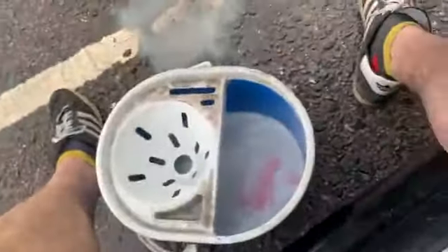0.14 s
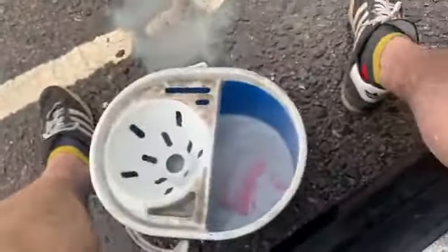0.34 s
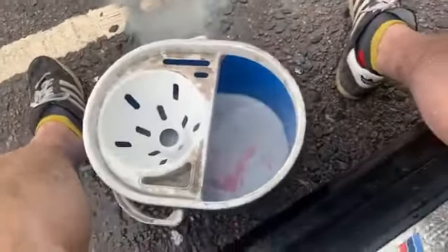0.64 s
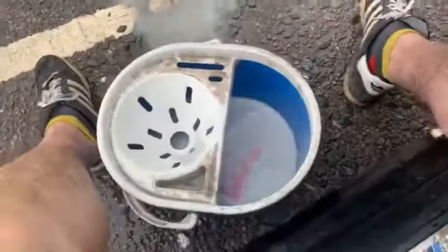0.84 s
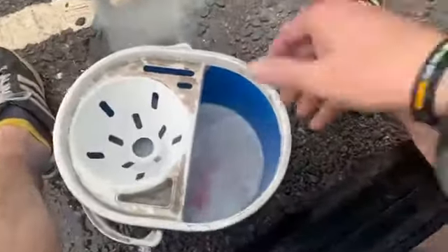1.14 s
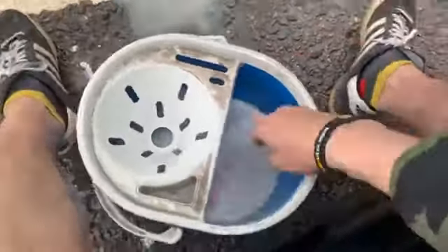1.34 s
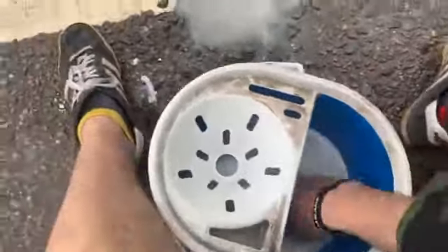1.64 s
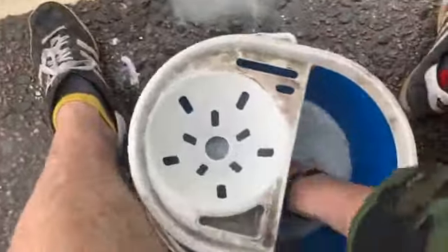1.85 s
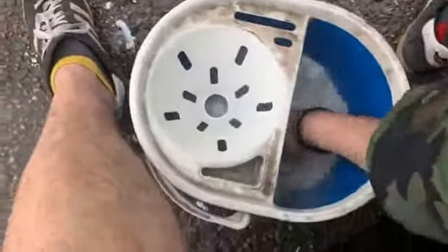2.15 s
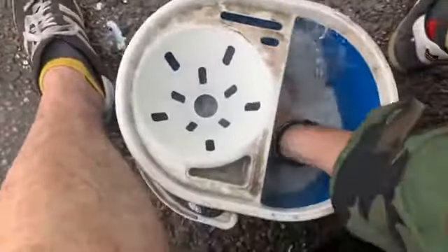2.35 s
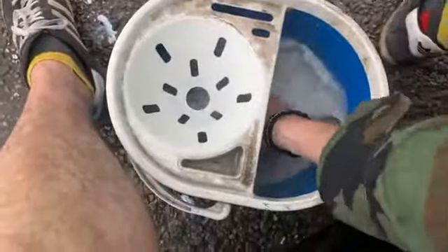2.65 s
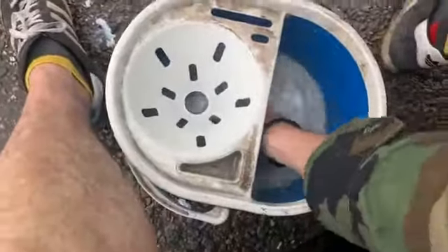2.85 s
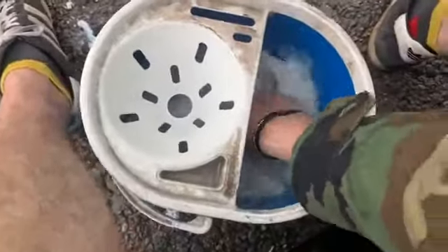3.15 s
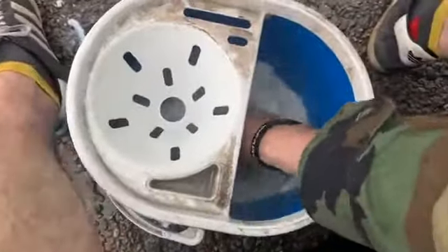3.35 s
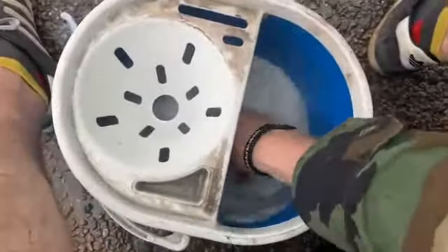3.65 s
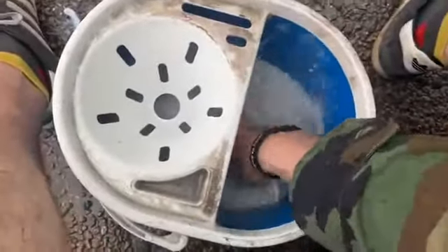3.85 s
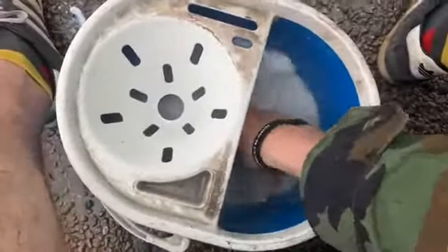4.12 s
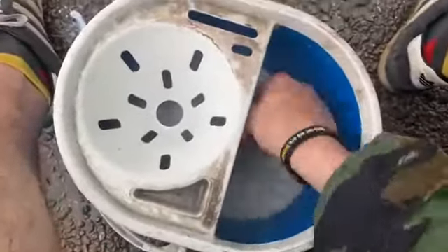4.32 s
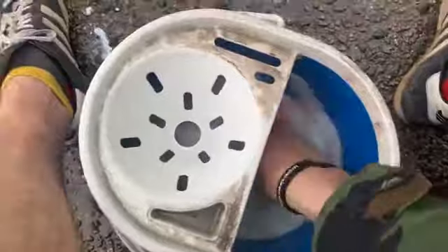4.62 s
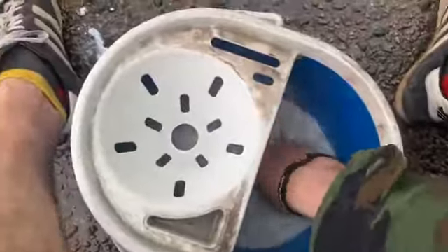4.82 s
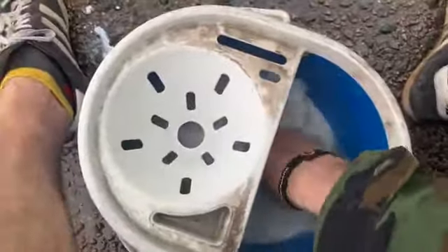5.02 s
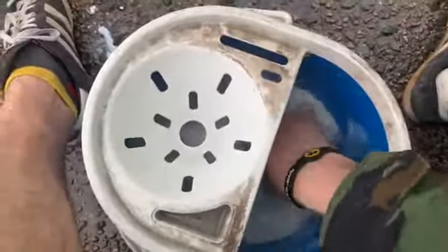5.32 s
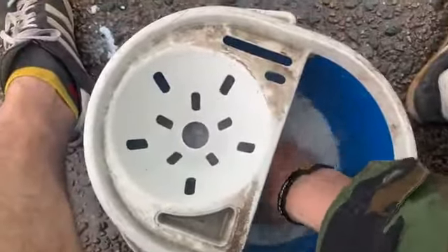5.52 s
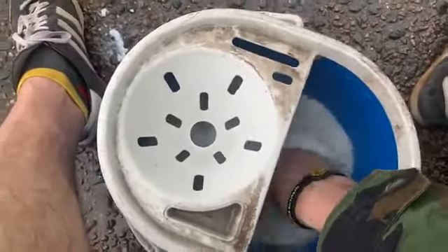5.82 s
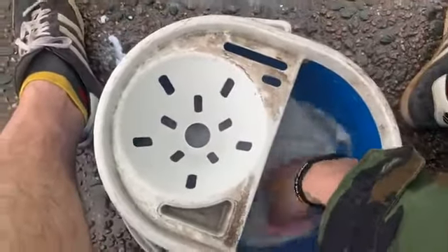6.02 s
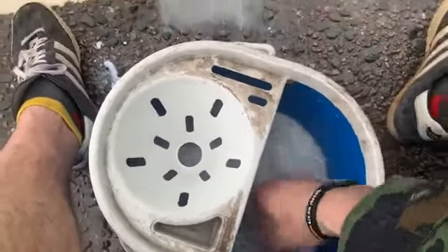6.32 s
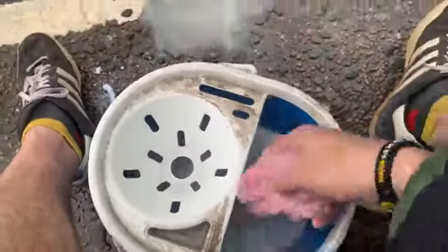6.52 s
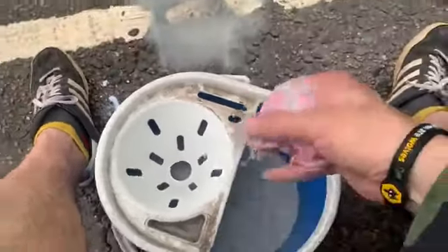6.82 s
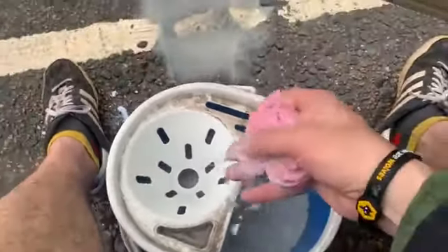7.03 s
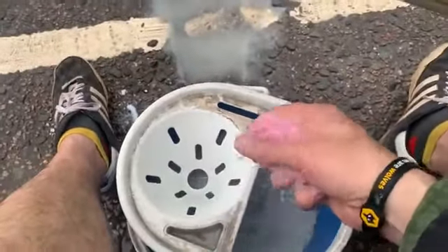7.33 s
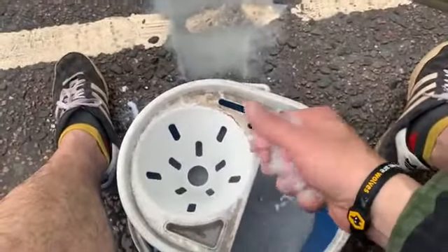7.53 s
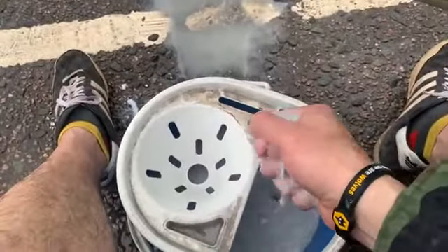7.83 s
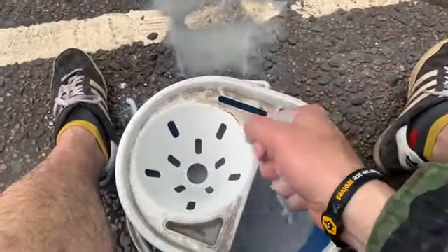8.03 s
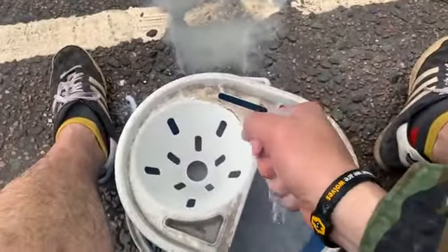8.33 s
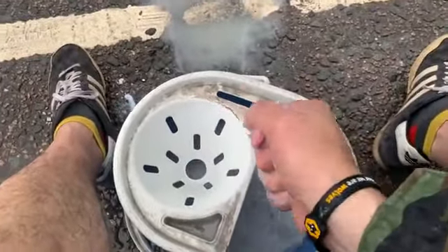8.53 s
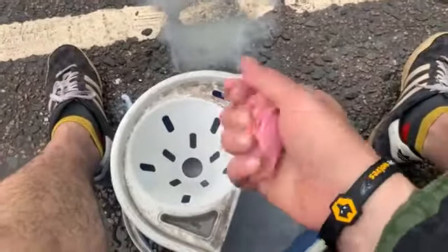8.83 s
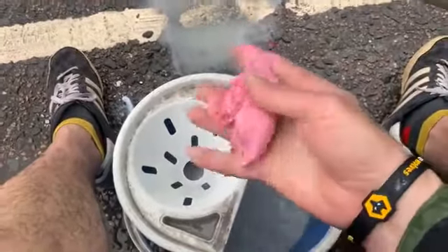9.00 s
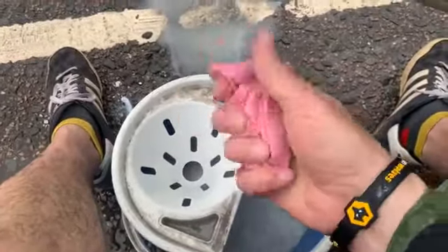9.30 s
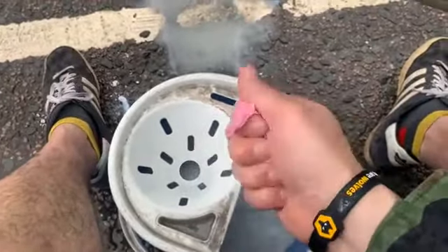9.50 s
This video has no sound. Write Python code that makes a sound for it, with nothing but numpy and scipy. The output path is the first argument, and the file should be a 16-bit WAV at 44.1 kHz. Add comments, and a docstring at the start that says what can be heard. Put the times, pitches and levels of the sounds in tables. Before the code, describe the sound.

A low rumble of distant traffic and a faint airy hiss run throughout this outdoor scene. In the first second, fingers knock and scrape on the microphone, loudest at about 0.5 and 0.7 seconds. Around 1.4 seconds a hand dips into a plastic bucket of water close by with a small gurgle. From 2 to about 6.3 seconds it swishes a cloth in uneven surges, with soft slaps, glugging bubbles and bright little splashes, busiest between 2.3 and 4.2 seconds. A far engine hums faintly around 4.5 to 5.4 seconds. At 6.7 seconds there is a light microphone bump as the cloth comes out dripping. From 7 to 8.6 seconds it is wrung out, and water trickles and spatters back into the bucket while the engine hum briefly returns, lower. The last drips fall just after 9 seconds, leaving only the traffic.

```python
"""Outdoors, a hand stirs a cloth in a plastic bucket of water, lifts it and wrings it out.
Each push sends up a surge of slaps, gurgle and spray; air pockets ring as glugging bubbles,
splashes spatter and drops trickle back between the close walls. The camera's case rings under
a few knocks and scraping fingers. Far traffic rumbles, with an engine note that comes and goes,
over a faint hiss of tyres and air and a thin whistle."""
import sys
import numpy as np
from scipy import signal
from scipy.fft import rfft, irfft
from scipy.io import wavfile
from scipy.ndimage import uniform_filter1d

SR = 44100
rng = np.random.default_rng(int(sys.argv[2]) if len(sys.argv) > 2 else 0)


def waveform_to_disk(signal):
    """Save audio, clipped to [-1, 1], as 16-bit WAV at the path in sys.argv[1]."""
    frames = np.transpose(np.atleast_2d(signal))
    scaled = np.clip(frames, -1, 1) * 32767
    samples = np.round(scaled).astype(np.int16)
    wavfile.write(sys.argv[1], SR, samples)


N = 426006

# The dull colour of clicks and scrapes on the case. Each row: frequency in Hz, level in dB per Hz.
GRIT_COLOUR = [(200, -45), (420, -3.5), (650, 10), (950, 1), (1500, -7.5), (2500, -18), (2900, -29.5),
               (8000, -43)]
# The bright colour of flying water. Each row: frequency in Hz, level in dB per Hz.
SPRAY_COLOUR = [(1180, -44), (2000, -14), (2440, -7.5), (2660, -14), (3050, -13), (4010, 2), (4450, -6.5),
                (5520, -7), (6170, -3), (6960, 1), (7850, -9), (9090, -2.5), (11900, -11.5), (13600, -11.5),
                (15600, -31)]


def gain_of(db):
    return 10 ** (np.asarray(db) / 20)


def unit_rms(x):
    return x / np.sqrt(np.mean(x ** 2) + 1e-20)


def fader(rows, column):
    """Gain at every sample from a column in dB; silent outside the table's times."""
    rows = np.array(rows)
    return gain_of(np.interp(np.arange(N) / SR, rows[:, 0], rows[:, column], -120, -120))


def add(mix, start_s, sound):
    part = mix[round(start_s * SR):][:len(sound)]
    part += sound[:len(part)]


def coloured(x, colour):
    """Minimum-phase EQ along a curve of (Hz, dB) points; white noise keeps its level."""
    hz, db = np.transpose(colour)
    bins_hz = abs(np.fft.fftfreq(8192, 1 / SR))
    log_gain = np.log(gain_of(np.interp(np.log(bins_hz + 1), np.log(hz + 1), db)))
    taps = np.fft.ifft(np.exp(np.conj(signal.hilbert(log_gain)))).real[:4096]
    return signal.oaconvolve(x, taps / np.linalg.norm(taps))[:len(x)]


def drift(seconds):
    """A random wander of rms 1, smoothed over the given time."""
    size = round(seconds * SR)
    return unit_rms(uniform_filter1d(uniform_filter1d(rng.standard_normal(N), size), size))


def traffic():
    """Far traffic: two bands of lumpy rumble."""
    # Each row: time in seconds, deep rumble in dB, upper rumble in dB.
    levels = [(0, -48, -50), (.4, -43.5, -49.5), (1, -47, -50), (1.6, -44.5, -47.5), (1.9, -46, -51),
              (2.1, -47, -43.5), (2.4, -45.5, -52), (3, -48, -51), (3.8, -48.5, -49), (4.1, -48, -45),
              (4.5, -49, -47.5), (5.1, -48, -45), (5.7, -51, -46.5), (6.2, -47.5, -50), (6.8, -50, -52.5),
              (7.8, -48.5, -52.5), (8.4, -52.5, -54), (9.66, -50.5, -55.5)]
    # The colours of the two bands. Each row: frequency in Hz, level in dB per Hz.
    deep_colour = [(18, -39), (30, -6), (40, -4.5), (52, 18), (63, 17.5), (80, 16), (100, 2.5),
                   (130, -53.5)]
    upper_colour = [(70, -23), (100, 1.5), (150, -3), (210, -5), (260, -14), (330, -17), (450, -33.5),
                    (600, -66)]
    deep = gain_of(1.45 * drift(0.11)) * coloured(rng.standard_normal(N), deep_colour)
    upper = gain_of(1.27 * drift(0.031)) * coloured(rng.standard_normal(N), upper_colour)
    return fader(levels, 1) * deep + fader(levels, 2) * upper


def flickering_treble(alone_db, alone_s, shared_db, shared_s):
    """Seven bands of bright noise that flicker partly alone and partly together."""
    together_db = shared_db * drift(shared_s)
    edges_hz = np.geomspace(1500, 16500, 8)
    out = np.zeros(N)
    for lo, hi in zip(edges_hz, edges_hz[1:]):
        bandpass = signal.butter(2, [lo, hi], "band", fs=SR, output="sos")
        band = signal.sosfilt(bandpass, rng.standard_normal(N))
        out += gain_of(alone_db * drift(alone_s) + together_db) * band
    return unit_rms(out)


def hiss():
    """Far noise of tyres and air, whose treble shifts from band to band."""
    # Each row: time in seconds, low hiss in dB, high hiss in dB.
    levels = [(0, -65, -71.5), (.46, -65.5, -76), (1.2, -64.5, -68), (1.72, -63.5, -67), (2.2, -62.5, -72),
              (3, -59.5, -70), (4, -60.5, -75), (4.5, -62.5, -76), (5.4, -61, -69.5), (6.4, -63, -72),
              (7.3, -64, -66), (8.1, -64, -76), (8.85, -65.5, -70.5), (9.66, -62.5, -70.5)]
    # The colours of the low and high hiss. Each row: frequency in Hz, level in dB per Hz.
    low_colour = [(240, -26.5), (400, -7), (664, -5), (800, -2.5), (1130, 2), (1270, -4.5), (1500, 5),
                  (1940, -7), (2400, -24.5), (3000, -18), (3700, -11), (4500, -20.5), (9000, -63)]
    high_colour = [(2500, -34.5), (4500, 4), (5600, 1.5), (6900, 6.5), (8100, -5.5), (9800, 1.5),
                   (12000, -4), (13000, -8), (13800, -33), (16000, -58)]
    low = gain_of(2.11 * drift(0.056)) * coloured(rng.standard_normal(N), low_colour)
    treble = flickering_treble(alone_db=1.5, alone_s=0.14, shared_db=1.1, shared_s=0.0063)
    return fader(levels, 1) * low + fader(levels, 2) * unit_rms(coloured(treble, high_colour))


def whistle(hz=3660):
    """A faint, fuzzy whistle at the opening: one narrow band of noise."""
    # Each row: time in seconds, level in dB.
    levels = [(0, -80), (.3, -75.5), (.55, -79), (1.2, -85)]
    narrow = signal.butter(2, [hz - 90, hz + 90], "band", fs=SR, output="sos")
    return fader(levels, 1) * unit_rms(signal.sosfilt(narrow, rng.standard_normal(N)))


def knocks():
    """Each blow rings the camera's case, with a dull click, a bright tick and a low thump."""
    # Each row: start in seconds, ring peak in dB, tick level in dB, thump level in dB.
    blows = [(0.146, -51.5, -63, -55), (0.307, -58, -61, -60), (0.361, -38.5, -63, -46),
             (0.386, -47, -69, -44), (0.425, -45, -67, -59), (0.446, -50, -72, -55), (0.481, -49, -63, -56),
             (0.519, -29, -29, -53), (0.664, -60, -71, -57), (0.674, -37.5, -65, -52),
             (0.695, -34, -54, -54), (0.724, -27, -50, -32), (0.737, -34, -68, -52), (0.744, -35, -67, -49),
             (1.276, -44.5, -60, -54), (6.676, -42.5, -60, -41), (6.704, -36.5, -60, -54)]
    # The case's modes. Each row: pitch in Hz, relative level in dB, t60 in seconds.
    modes = [(640, 0, 0.018), (855, -5, 0.023), (956, -3.5, 0.018), (432, 1, 0.012), (1500, -35, 0.011),
             (2410, -17.5, 0.011)]
    # The tick's colour. Each row: frequency in Hz, level in dB per Hz.
    tick_colour = [(500, -6), (1200, 5), (2000, 0), (3300, 4), (5000, -19), (7000, -4), (9000, -18),
                   (12000, -13), (16000, -47)]
    body, ticks, clicks = np.zeros((3, N))
    t = np.arange(4000) / SR
    for start, db, tick_db, thump_db in blows:
        noise = rng.standard_normal(len(t))
        shares_db = 2 * noise[:len(modes)]  # where the blow lands shifts each mode's share
        ring = sum(gain_of(mode_db + share_db - 60 * t / t60) * np.sin(2 * np.pi * hz * t)
                   for (hz, mode_db, t60), share_db in zip(modes, shares_db))
        ring *= (1 - np.exp(-t / 0.00091)) ** 2
        add(body, start, gain_of(db) * ring / abs(ring).max())
        add(body, start, gain_of(thump_db - 0.5) * ping(170, t60=0.081, rise=0))
        add(ticks, start + 0.000945, gain_of(tick_db + 1.5 - 60 * t / 0.0054) * np.sign(noise))
        add(clicks, start + 0.000917, gain_of(db + 2.0 - 60 * t / 0.00088))
    return body + coloured(ticks, tick_colour) + coloured(clicks, GRIT_COLOUR)


def scrapes():
    """Fingers slip on the camera in short, gritty rubs."""
    # One fader curve a rub. Each row: time in seconds, level in dB.
    rubs = [
        [(.35, -78), (.365, -49), (.4, -56), (.45, -58), (.5, -64), (.55, -63)],
        [(.645, -83), (.67, -45), (.7, -42), (.715, -53), (.73, -31), (.755, -55), (.78, -66)],
        [(6.665, -74), (6.685, -54), (6.71, -66), (6.74, -70)],
    ]
    slips = gain_of(3.5 * drift(0.0017)) * rng.standard_normal(N)
    return sum(fader(rub, 1) for rub in rubs) * unit_rms(coloured(slips, GRIT_COLOUR))


def ping(hz, t60, rise, attack=0.0067):
    """A swelling, dying sine; rise bends it up like a surfacing bubble. Attack is a share of t60."""
    t = np.arange(round(t60 * SR) + 20) / SR
    envelope = (1 - np.exp(-t / (attack * t60))) ** 2 * gain_of(-60 * t / t60)
    return envelope / envelope.max() * np.sin(2 * np.pi * hz * (t + rise * t ** 2 / t60))


def swarm(lo_hz, hi_hz, cycles, per_s, spread_db, clump, pitches=30):
    """Many bubbles in random clumps, a few of them loud; each rings for the given cycles."""
    out = np.zeros(N)
    rate = per_s * np.exp(clump * drift(0.008) - clump ** 2 / 2)
    strength = gain_of(spread_db * np.minimum(rng.exponential(1, N), 4))
    births = strength * (rng.random(N) < rate / SR)
    pitch_index = rng.integers(0, pitches, N)
    for k, hz in enumerate(np.geomspace(lo_hz, hi_hz, pitches)):
        grain = ping(hz, cycles / hz, rise=0.11, attack=0.13)
        out += signal.oaconvolve(births * (pitch_index == k), grain / np.linalg.norm(grain))[:N]
    return unit_rms(out)


def surges(swell_s=0.015, ebb_t60_s=0.097):
    """Gains of slap, gurgle and spray: at each push or squeeze the water swells, holds and ebbs."""
    # Each row: crest time in seconds, hold in seconds, then slap, gurgle and spray levels in dB.
    pushes = [(1.406, 0.0087, -80, -47, -62.5), (1.928, 0.04, -64, -59, -67), (2.248, 0.029, -61, -51, -64),
              (2.284, 0.04, -65, -49, -58), (2.35, 0.046, -50, -48.5, -52), (2.47, 0.035, -52, -51.5, -56),
              (2.562, .03, -55, -51, -73), (2.619, 0.039, -65, -58, -55), (2.689, 0.014, -65, -48, -57.5),
              (2.756, 0.037, -81, -73, -60), (2.807, 0.099, -55, -46, -60),
              (2.943, 0.039, -54, -44.5, -52.5), (3.042, 0.016, -67, -79, -60.5),
              (3.115, 0.048, -70, -50, -61), (3.172, 0.066, -62, -49.5, -57),
              (3.262, 0.031, -56.5, -53, -60), (3.355, 0.063, -46, -49, -59.5),
              (3.427, 0.016, -63, -67, -59), (3.561, 0.017, -59, -50.5, -59), (3.588, 0.016, -58, -54, -59),
              (3.67, 0.032, -51, -50, -55), (3.802, 0.042, -49, -49, -56), (3.943, 0.079, -70, -57, -57),
              (4.08, 0.036, -77, -53, -61), (4.151, 0.041, -55, -57, -62.5), (4.225, 0.014, -51, -49, -54),
              (4.577, 0.018, -80, -76, -62), (4.76, 0.015, -45, -72.5, -74), (4.825, .03, -68, -57, -71),
              (5.028, 0.06, -54.5, -58, -84), (5.149, 0.052, -66, -56, -58),
              (5.345, 0.039, -75, -62, -60.5), (5.39, 0.049, -71, -50, -58),
              (5.44, 0.062, -52, -51.5, -57.5), (5.733, 0.036, -56, -59, -60), (5.963, 0.12, -59, -70, -67),
              (6.097, 0.034, -68, -52.5, -67.5), (6.169, 0.031, -70, -59, -62),
              (6.261, 0.032, -55.5, -59, -60.5), (6.7, 0.079, -84, -68, -67), (7.007, .05, -81, -76, -60.5),
              (7.09, 0.041, -87, -63, -69), (7.32, 0.048, -82, -59, -59), (7.39, 0.11, -61.5, -58, -66),
              (7.73, 0.023, -68, -56.5, -80), (8.03, 0.036, -70, -61, -65), (8.105, 0.074, -77, -59, -59),
              (8.984, 0.016, -74, -72, -82), (9.08, .03, -67, -65, -70.5)]
    powers, t = np.zeros((3, N)), np.arange(SR // 2) / SR
    swell = np.minimum(t / swell_s, 1)
    for crest, hold, *levels_db in pushes:
        ebb_db = 60 * np.maximum(t - swell_s - hold, 0) / ebb_t60_s
        for power, db in zip(powers, levels_db):
            add(power, crest - swell_s, (swell * gain_of(db - ebb_db)) ** 2)
    return np.sqrt(powers)


def stirring():
    """Churned water: low slaps, gurgling bubbles, and tiny bursting drops over wet noise."""
    # The churn and trickle between surges. Each row: time in seconds, gurgle in dB, spray in dB.
    churn = [(1.5, -66, -73), (1.8, -83, -69), (2.0, -52, -67), (2.2, -68, -70.5), (2.4, -52.5, -59.5),
             (2.75, -59, -61.5), (3.0, -61, -62), (3.5, -60, -63.5), (3.9, -55, -59.5), (4.15, -59.5, -69),
             (4.3, -68, -78), (4.7, -68.5, -73), (5.25, -58.5, -64), (5.6, -61.5, -74), (6.05, -58.5, -70),
             (6.4, -71, -71), (7.2, -89, -69), (7.5, -62, -60.5), (8.1, -61, -59.5), (8.6, -73, -65),
             (8.9, -86, -74), (9.3, -91, -85)]
    # The colours of slap and gurgle in the bucket. Each row: frequency in Hz, level in dB per Hz.
    slap_colour = [(180, -27), (280, 0.5), (345, -6), (450, -2), (620, -21.5), (800, -3), (1200, -57.5)]
    gurgle_colour = [(150, -48), (250, -5), (345, 11), (518, -11), (671, -8), (871, -7.5), (966, -3),
                     (1560, 6), (2020, -13.5), (2440, -56), (3000, -29), (3900, -71), (6600, -120)]
    slaps = swarm(224.6, 910, cycles=22, per_s=250, spread_db=3, clump=0.65, pitches=16)
    gurgle = swarm(506.2, 2814, cycles=41, per_s=500, spread_db=2.5, clump=0.82)
    drops = swarm(2170, 19400, cycles=21, per_s=900, spread_db=4, clump=1.1)
    wet_noise = flickering_treble(alone_db=4.5, alone_s=0.011, shared_db=2.5, shared_s=0.0065)
    spray = 0.51 * drops + 0.81 * wet_noise
    slap_surge, gurgle_surge, spray_surge = surges()
    gurgle_bed, spray_bed = fader(churn, 1), fader(churn, 2)
    slap_bed = gain_of(-10) * gurgle_bed
    return (np.hypot(slap_surge, slap_bed) * unit_rms(coloured(slaps, slap_colour))
            + np.hypot(gurgle_surge, gurgle_bed) * unit_rms(coloured(gurgle, gurgle_colour))
            + np.hypot(spray_surge, spray_bed) * unit_rms(coloured(spray, SPRAY_COLOUR)))


def bubbles(rise=0.1):
    """Single air pockets ring, each tearing off two fainter ones; churning water makes them flutter."""
    # Each row: start in seconds, level in dB, pitch in Hz.
    glugs = [(1.405, -45, 1220), (1.8827, -48.5, 1630), (1.927, -45, 970), (2.033, -49, 352),
             (2.253, -31.5, 1395), (2.2932, -39, 1300), (2.3313, -37.5, 1180), (2.368, -45, 343),
             (2.3913, -41, 1290), (2.474, -43, 1180), (2.476, -41, 435), (2.6279, -33, 1470),
             (2.6793, -39.5, 1430), (2.814, -36.5, 1187), (2.818, -33, 640), (2.8345, -34.5, 977),
             (2.9327, -42, 1310), (2.9554, -34, 1466), (2.9794, -34.5, 1590), (3.032, -60, 1510),
             (3.0932, -34, 1420), (3.164, -33, 327), (3.1806, -44, 1150), (3.26, -43.5, 1150),
             (3.3423, -46, 1710), (3.361, -46.5, 350), (3.3614, -41, 1160), (3.3826, -46, 1400),
             (3.391, -43.5, 2350), (3.4205, -43, 1300), (3.582, -40, 1260), (3.6444, -39, 1510),
             (3.677, -39, 1380), (3.679, -44, 321), (3.709, -37.5, 1510), (3.724, -41.5, 361),
             (3.808, -39.5, 316), (3.9454, -37, 1600), (3.968, -45, 327), (4.0444, -48, 1360),
             (4.123, -41, 1420), (4.2353, -44, 1370), (4.553, -48.5, 1610), (4.7526, -44.5, 1500),
             (4.753, -51, 287), (4.831, -43, 1660), (4.997, -44.5, 1010), (5.0464, -45, 1100),
             (5.062, -34.5, 1552), (5.1065, -42, 1540), (5.1505, -42.5, 1510), (5.176, -53, 290),
             (5.2446, -42, 1560), (5.319, -45, 1520), (5.375, -40, 1300), (5.4306, -37, 1070),
             (5.432, -34, 352), (5.487, -37.5, 335), (5.5717, -48, 1630), (5.736, -40, 1540),
             (5.743, -36.5, 347), (5.9376, -44.5, 1480), (5.9663, -48, 1610), (6.0149, -42.5, 1650),
             (6.056, -42, 1140), (6.26, -50, 268), (6.2616, -38, 1640), (7.005, -43.5, 1300),
             (7.0802, -43.5, 1340), (7.268, -47.5, 1500), (7.391, -46, 564), (7.43, -47, 580),
             (7.6316, -46, 1710), (7.654, -45.5, 1550), (7.839, -51.5, 430), (8.051, -49, 1150),
             (8.1371, -38, 1660), (8.166, -47, 1720), (8.3096, -48, 1580), (8.3678, -47.5, 1560),
             (8.5886, -46, 1550), (9.0616, -46.5, 1120)]
    out = np.zeros(N)
    for start, db, hz in glugs:
        t60 = 0.035 * (1000 / hz) ** 0.75  # larger, lower bubbles ring longer
        add(out, start, gain_of(db) * ping(hz, t60, rise, attack=0.019))
        for lag, detune in rng.random((2, 2)):
            torn_off = ping(hz * (0.77 + 0.43 * detune), 0.73 * t60, rise, attack=0.097)
            add(out, start + 0.016 * lag, gain_of(db - 12.5) * torn_off)
    return out * gain_of(1.36 * drift(0.0025))


def splashes(trim_db=-11.5):
    """Water lands with a snap, then spreads as dull or bright spatter with two short rings on top."""
    # Each row: start in seconds, level before the trim in dB, ring pitch in Hz,
    # ring over spatter in dB, spatter t60 in seconds, tilt in dB per octave.
    landings = [(1.6696, -49, 3780, 9.5, 0.045, 0.1), (1.7455, -51.5, 5500, 12.5, 0.037, 0.1),
                (1.8827, -49, 4300, 10, 0.051, -4), (1.9134, -47, 3640, 13, 0.045, -7),
                (1.9295, -33.5, 4340, 1, 0.041, 2), (1.963, -45, 4400, 8, 0.045, -2),
                (2.0604, -39, 7200, -3, 0.045, -6), (2.2484, -45, 4050, 5, 0.049, -11),
                (2.2615, -38, 7060, 4, 0.05, -11), (2.2986, -39, 7000, -2, 0.055, -5),
                (2.352, -33.5, 3750, -4, 0.072, -10), (2.4534, -32.5, 3950, -2.5, 0.051, 6),
                (2.5088, -45, 9000, 8, 0.045, 0.1), (2.5526, -48.5, 7140, 12.5, 0.045, 6),
                (2.5956, -45, 9750, 8, 0.045, 5), (2.611, -41, 3610, -7, 0.045, 3),
                (2.636, -34.5, 8500, 4.5, 0.045, 6), (2.6797, -37, 9600, 2, 0.045, 6),
                (2.7762, -35.5, 9100, 5.5, 0.051, -5), (2.8031, -42, 3800, 5, 0.045, 0.1),
                (2.9344, -39.5, 3700, 7.5, 0.041, 2), (2.968, -29.5, 6650, -4, 0.067, 2),
                (2.9722, -29, 3960, 3, 0.069, 0.1), (3.057, -40, 7100, -1, 0.045, 14),
                (3.1584, -32.5, 3900, 0, 0.045, -3), (3.3438, -43.5, 3900, 11.5, 0.036, 0.1),
                (3.3793, -28, 6930, 1, 0.045, 3.5), (3.4726, -50, 9060, 12, 0.038, 0.1),
                (3.498, -43, 6880, 10.5, 0.04, 6), (3.5339, -43, 8500, 7, 0.045, 3),
                (3.5783, -30, 3970, -1.5, 0.05, 8), (3.6213, -38, 4030, 5, 0.045, 0.1),
                (3.6337, -40, 3740, 8, 0.032, -4), (3.6616, -51, 6960, -10, 0.045, -3),
                (3.6814, -25.5, 7050, -16, 0.072, -1), (3.7904, -47, 8940, 5, 0.045, 0.1),
                (3.8104, -34.5, 6940, -4, 0.062, 6), (3.8358, -30, 6280, 7, 0.039, 7),
                (3.935, -41, 4080, 3, 0.045, 0.1), (3.964, -28, 3930, -10, 0.062, -1),
                (4.0742, -39, 6930, -1, 0.049, 0.1), (4.179, -41, 3550, 1, 0.039, 5),
                (4.2249, -33, 3810, -11, 0.036, 8), (4.5721, -52, 6300, 8, 0.045, 0.1),
                (4.59, -41.5, 4000, 1, 0.045, 4), (4.7751, -44, 3750, 4.5, 0.045, 4),
                (4.8185, -44, 3640, -6, 0.045, 0.1), (4.832, -33.5, 3630, -1, 0.045, -5),
                (5.0877, -38, 4100, 1, 0.045, -6), (5.1056, -35.5, 4140, -4, 0.045, -3),
                (5.1467, -39.5, 3920, 5.5, 0.051, -3), (5.173, -33.5, 4050, -1.5, 0.042, 2),
                (5.263, -36.5, 10760, 4, 0.039, -4), (5.6905, -40.5, 6860, 3, 0.056, -2),
                (5.7863, -44.5, 3520, 4, 0.045, -4), (5.9016, -42.5, 9230, 3, 0.064, -5),
                (5.969, -38, 7260, 2.5, 0.038, -5), (6.7236, -38.5, 7250, -4, 0.061, 4),
                (6.795, -38, 6880, 3, 0.07, 3), (7.016, -39.5, 3730, -4, 0.06, 2),
                (7.0784, -27.5, 6820, 5.5, 0.032, -5), (7.1048, -43.5, 6760, 8, 0.045, 2),
                (7.258, -43, 6950, 0, 0.054, 0.1), (7.3398, -46, 6800, 9, 0.041, 3),
                (7.3763, -42, 6500, 9, 0.04, -11), (7.4287, -32, 4250, -2, 0.041, -5),
                (7.4924, -40, 4030, -4, 0.049, 4), (7.5668, -31.5, 7130, -5, 0.036, 3),
                (7.6293, -40, 7000, 3, 0.051, -6), (7.657, -45, 3660, 6, 0.041, -6),
                (7.683, -37.5, 6440, 0, 0.04, 5), (7.7758, -40.5, 4140, 6, 0.045, 0.1),
                (7.8313, -41, 6800, 7.5, 0.051, -4), (7.9057, -40, 6180, 3.5, 0.045, -10),
                (7.9334, -55, 6760, -1, 0.045, 0.1), (7.9476, -44, 6700, 9, 0.045, 7),
                (7.9709, -41, 6750, 3, 0.052, -3), (8.006, -39, 6860, 6, 0.051, 12),
                (8.0746, -44, 6740, 11, 0.042, 7), (8.0968, -30.5, 4240, 1.5, 0.031, 2),
                (8.128, -37, 6400, 0, 0.054, 3), (8.2003, -34.5, 6260, -1, 0.068, 2),
                (8.273, -40, 6650, 17.5, 0.029, 11), (8.3076, -41.5, 9300, 6.5, 0.04, 2),
                (8.365, -42, 6150, 12.5, 0.076, 10), (8.465, -38, 6770, 3.5, 0.089, 6),
                (8.5346, -44, 6300, 10, 0.036, 13), (8.584, -42, 7100, 1, 0.057, 5),
                (8.652, -40.5, 7060, 3, 0.035, 0.1), (8.7531, -41.5, 6710, -4, 0.041, 3),
                (8.804, -47, 7180, 3, 0.045, 0.1), (8.9106, -41.5, 8700, 2, 0.035, 3),
                (8.9461, -52, 6700, 9, 0.038, 2), (8.999, -38.5, 6230, -5, 0.049, 8),
                (9.0945, -45, 7160, 5, 0.045, 11)]
    bursts, rings = np.zeros((2, N))
    t = np.arange(4096) / SR
    octaves = np.log2((np.fft.rfftfreq(len(t), 1 / SR) + 1500) / 7500)
    snap = gain_of(-3.5 - 60 * t / 0.0079)
    for start, db, hz, ring_db, t60, tilt_db in landings:
        noise = rng.standard_normal(len(t))
        tilted = irfft(rfft(noise) * gain_of(tilt_db * octaves))
        spatter = gain_of(-60 * t / t60) * (1 - np.exp(-t / 0.0038))
        add(bursts, start, gain_of(db + trim_db) * (snap + spatter) * tilted)
        drop_db = db + trim_db + ring_db
        add(rings, start, gain_of(drop_db) * ping(hz, t60=0.013, rise=0.018, attack=0.034))
        lag, detune = noise[:2]
        second_drop = ping(hz * (1 + 0.068 * detune), t60=0.0072, rise=0.051)
        add(rings, start + 0.003 * abs(lag), gain_of(drop_db + 1) * second_drop)
    return coloured(bursts, SPRAY_COLOUR) + rings


def bucket(x, t60=0.11, wet_db=-9):
    """The bucket's close walls throw back a short, dense tail."""
    t = np.arange(3000) / SR
    tail = rng.standard_normal(len(t)) * gain_of(-60 * t / t60) * (t > 0.0015)
    return x + gain_of(wet_db) * signal.oaconvolve(x, tail / np.linalg.norm(tail))[:N]


def engine():
    """A far engine's wavering note rises out of the traffic twice."""
    # One curve a note. Each row: time in seconds, pitch in Hz, level in dB.
    notes = [
        [(4.3, 165, -60), (4.45, 165, -46), (4.65, 175, -51), (4.95, 172, -53), (5.1, 165, -47),
         (5.35, 164, -49), (5.45, 163, -62)],
        [(7.3, 114, -62), (7.45, 115, -54), (7.65, 115, -50), (7.95, 117, -50), (8.2, 115, -62)],
    ]
    out = np.zeros(N)
    for note in notes:
        times, hz, _ = np.transpose(note)
        pitch = np.interp(np.arange(N) / SR, times, hz) * (1 + 0.00906 * drift(0.034))
        level = uniform_filter1d(fader(note, 2), 2000) * gain_of(0.72 * drift(0.037))
        out += np.sqrt(2) * level * np.sin(2 * np.pi * np.cumsum(pitch) / SR)
    return out


def scene():
    """Water, outdoor background and handling noise, mixed to mono."""
    water = stirring() + bucket(bubbles() + splashes())
    background = traffic() + engine() + hiss() + whistle()
    return (water + background + knocks() + scrapes())[None]


def record(dry, cutoff_hz=15790):
    """A steep low-pass takes off the very top."""
    lowpass = signal.firwin(511, cutoff_hz, window=("kaiser", 9), fs=SR)
    return signal.oaconvolve(dry, lowpass[None], "same")


dry = scene()
out = record(dry)
waveform_to_disk(out)
```